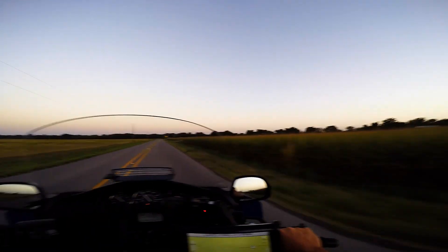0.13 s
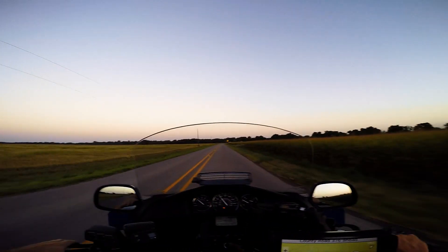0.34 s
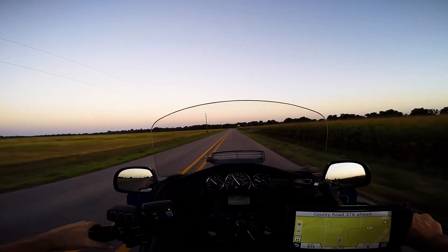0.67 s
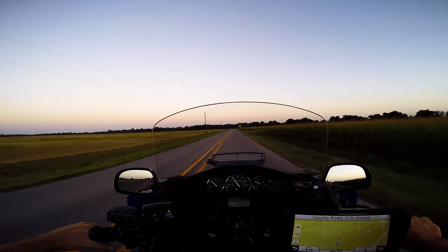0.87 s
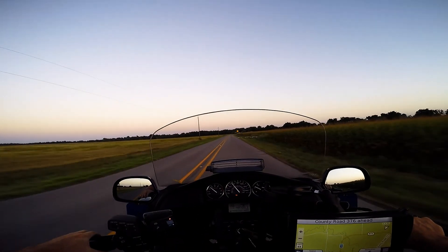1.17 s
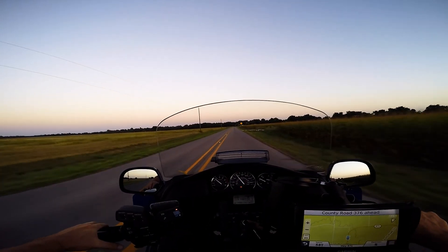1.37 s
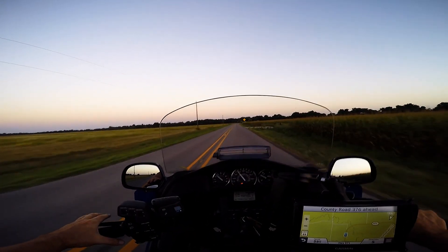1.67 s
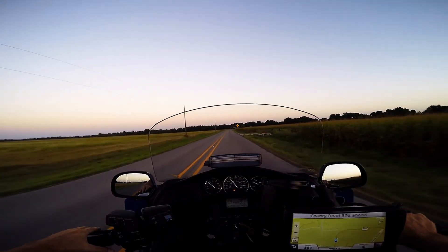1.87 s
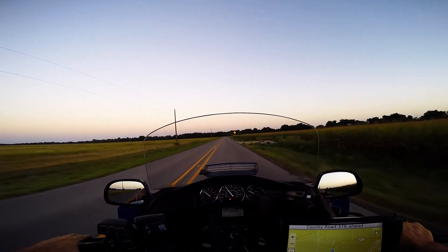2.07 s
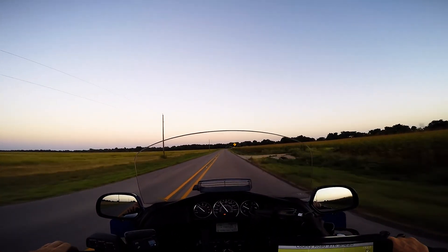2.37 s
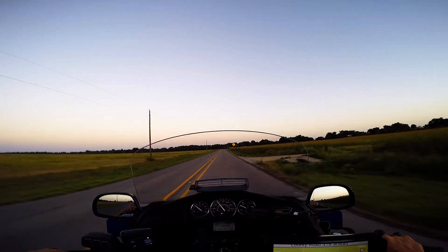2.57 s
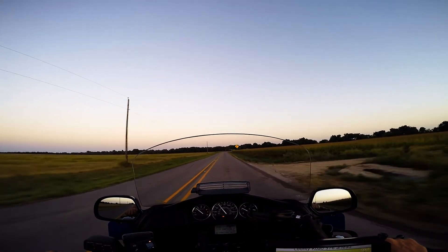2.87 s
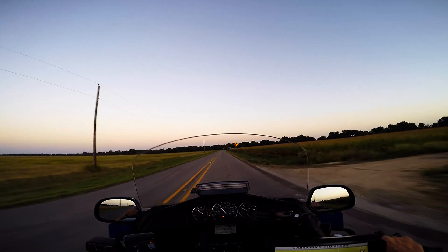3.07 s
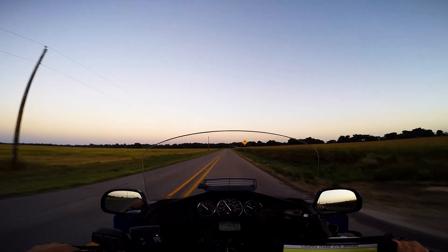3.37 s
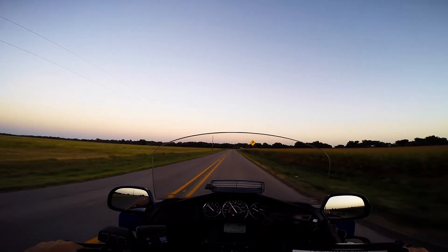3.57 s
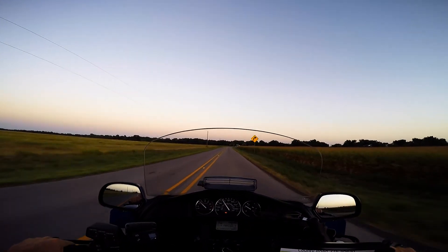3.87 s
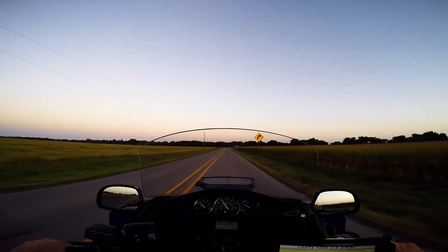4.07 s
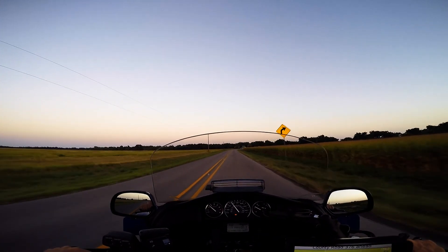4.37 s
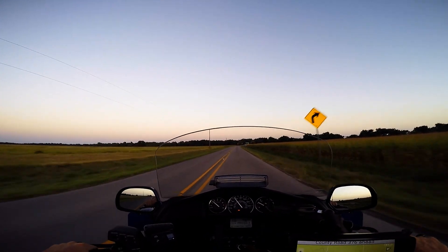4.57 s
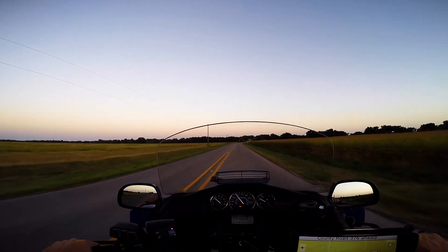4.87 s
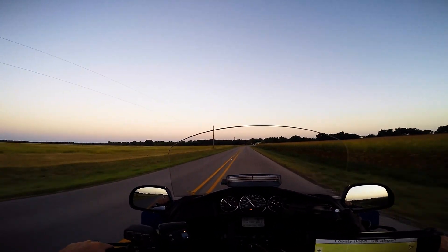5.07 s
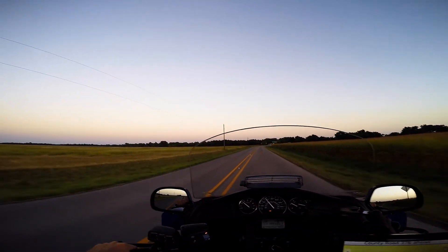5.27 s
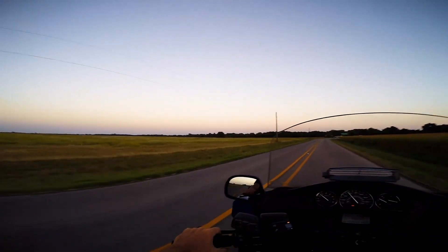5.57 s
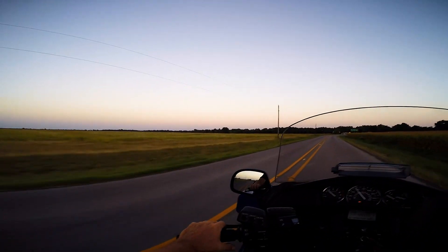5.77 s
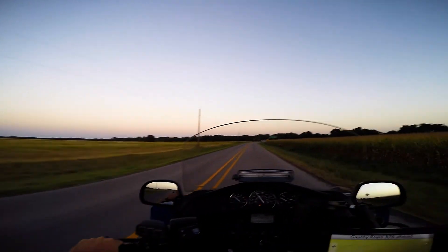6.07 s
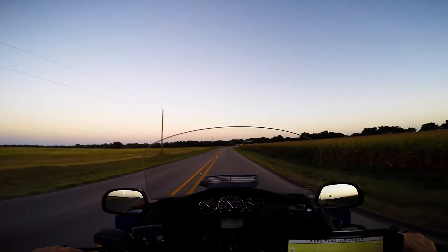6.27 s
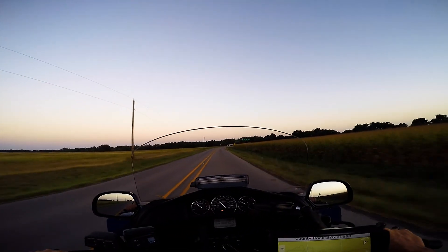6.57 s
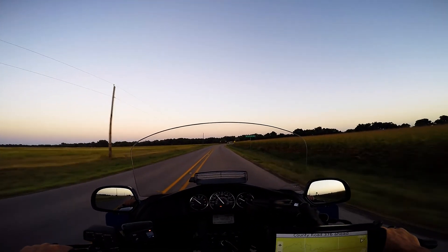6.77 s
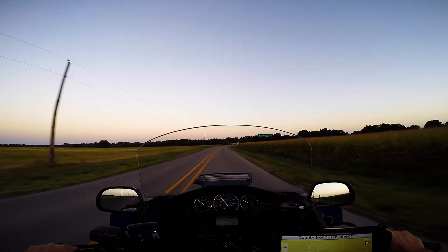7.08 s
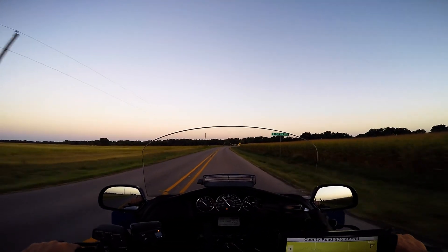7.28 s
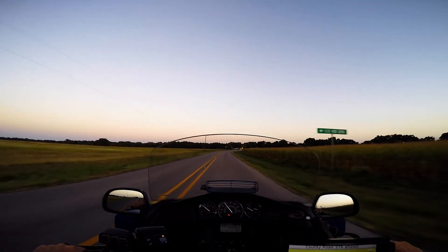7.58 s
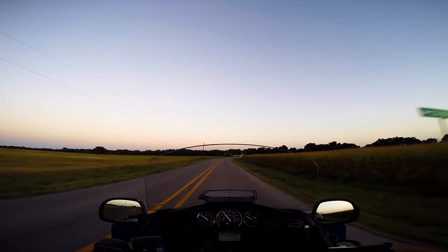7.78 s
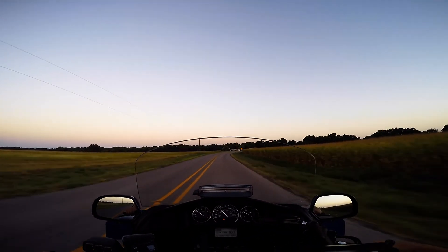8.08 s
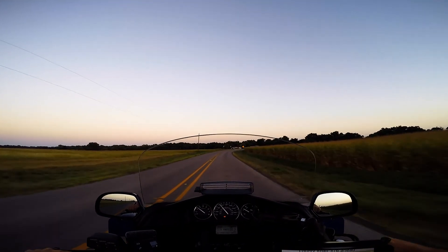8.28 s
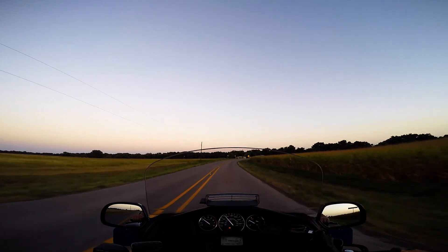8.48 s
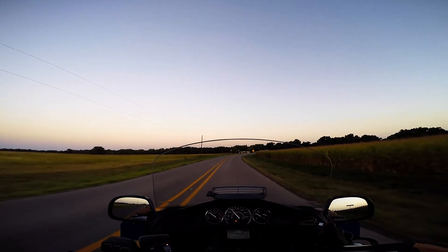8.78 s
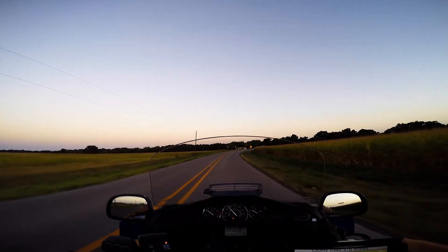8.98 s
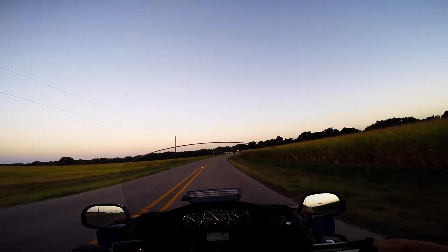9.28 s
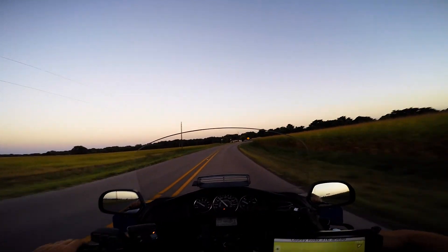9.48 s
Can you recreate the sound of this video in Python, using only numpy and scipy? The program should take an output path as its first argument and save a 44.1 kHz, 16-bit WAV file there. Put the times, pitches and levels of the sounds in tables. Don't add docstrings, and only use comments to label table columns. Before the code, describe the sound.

A motor trike cruises an open country road. Irregular low wind thumps strike a close microphone behind the windshield, over rumble, steady tyre and engine roar and a faint gear whine. Nearly everything sits on the right; the left carries only weak, muffled leakage and hiss. A loose plug crackles and briefly drops out near 1.6 and 6.6 seconds. After 8 seconds the whine fades and the roar eases.

```python
import sys
import numpy as np
from scipy import signal
from scipy.io import wavfile
from scipy.ndimage import uniform_filter1d

SR = 44100
rng = np.random.default_rng(int(sys.argv[2]) if len(sys.argv) > 2 else 0)


def how_loud(loudness_db):
    steps = np.asarray(loudness_db, float) / 20
    return 10 ** steps


def dump_mix(stems):
    frames = np.atleast_2d(stems).T
    limited = np.clip(frames, -1, 1)
    pcm = np.round(limited * 32767).astype(np.int16)
    wavfile.write(sys.argv[1], SR, pcm)


N = 425124


def rms_one(x):
    return x / np.sqrt(np.mean(x ** 2) + 1e-20)


def in_time(rows):
    s, *columns = np.transpose(rows)
    return [np.interp(np.arange(N) / SR, s, c) for c in columns]


def stretch(slow):
    return np.interp(np.arange(N) / 20, np.arange(len(slow)), slow)


def slow_chance(rate):
    r = np.exp(-40 * np.pi * rate / SR)
    white = rng.standard_normal(N // 20 + 3002)
    return rms_one(signal.lfilter([1], [1, -2 * r, r * r], white)[3000:])


def drift(rate):
    return stretch(slow_chance(rate))


def butter(x, hz, kind, order=2):
    return signal.sosfilt(signal.butter(order, hz, kind, fs=SR, output="sos"), x)


def resonance(x, hz, width):
    r = np.exp(-np.pi * width / SR)
    top = np.array([1, 0, -1]) * (1 - r * r) / 2
    return signal.lfilter(top, [1, -2 * r * np.cos(2 * np.pi * hz / SR), r * r], x)


def banded_noise(spectrum, shared_db, own_db, rate):
    hz, level_db = np.transpose(spectrum)
    thirds = int(3 * np.log2(hz[-1] / hz[0]))
    edges = hz[0] * 2 ** (np.arange(thirds + 1) / 3)
    white = rng.standard_normal((2, N + 8192))
    shared = shared_db * slow_chance(rate)
    out = 0
    for k, (low, high) in enumerate(zip(edges, edges[1:])):
        band_db = np.interp(np.log(low * high) / 2, np.log(hz), level_db)
        gain = stretch(how_loud(band_db + shared + own_db * slow_chance(2.9 * rate)))
        out = out + gain * butter(white[k % 2], [low, high], "band")[8192:]
    return rms_one(out)


def eddies():
    # centre t/s, level/dB rms, half-
    # power length/ms, swirl f/Hz
    buffets = [(.227, -28, 25, 117), (.291, -22.5, 90, 110), (.361, -22, 9.2, 161), (.566, -28.5, 13, 101),
               (.695, -21.5, 12, 114), (1.898, -21.5, 16, 112), (2.189, -27.5, 90, 114),
               (2.35, -27.5, 71, 104), (2.741, -22, 8, 125), (2.84, -17, 12, 110), (3.087, -24, 41, 159),
               (3.155, -20.5, 12, 166), (3.2, -24.5, 43, 104.5), (3.366, -24, 17.5, 168),
               (3.545, -21, 12.7, 146), (4.153, -24.5, 35, 120), (4.182, -19, 18, 176),
               (4.23, -24.5, 32, 110), (4.426, -21.5, 28, 137), (4.485, -24.5, 21, 121),
               (4.665, -16, 19, 136), (4.692, -17.5, 12, 103), (5.009, -21, 24, 133),
               (5.166, -26.5, 9.2, 159), (5.942, -26.5, 16, 105), (6.044, -19, 37, 136),
               (6.138, -24, 13, 110), (7.112, -25.5, 35, 132), (7.445, -22.5, 16.7, 175),
               (7.47, -23.5, 36, 86),
               (0.038, -34.5, 36, 112), (.457, -30.5, 18, 129), (0.521, -27.5, 21, 120), (.738, -30, 30, 121),
             (0.824, -30, 9.3, 104), (.927, -30, 30, 113), (1.081, -28, 19, 141), (1.267, -26, 34, 86),
             (1.423, -27.5, 29, 132), (1.651, -32, 8, 124), (1.996, -28, 32, 143), (2.134, -30.5, 16, 111),
             (3.931, -28.5, 77, 136), (4.365, -29.5, 33, 170.4), (4.738, -27, 13, 142),
             (4.878, -28, 25, 180), (5.306, -27.5, 48, 109), (6.259, -27, 21, 142), (6.331, -25.5, 25, 155),
             (6.638, -28, 14.6, 103), (6.78, -30, 57, 98), (6.998, -28, 12, 100), (7.285, -27, 28, 165),
             (7.867, -25.5, 18, 126), (7.945, -26, 100, 107), (8.515, -26, 27, 131),
             (8.741, -33.5, 34, 135), (9.0, -29.5, 180, 138), (9.144, -28, 36, 148), (9.509, -30, 130, 136)]
    # centre t/s, level/dB rms, swirl f/Hz
    ripples = [(0.411, -25, 94), (1.031, -35, 105), (1.538, -41, 197), (1.739, -32, 126),
               (1.814, -36.5, 205), (2.51, -33.5, 125), (2.642, -32, 136), (2.803, -36, 98),
               (3.008, -35.5, 113), (3.631, -32.5, 128), (3.865, -37.5, 105), (4.016, -44, 160),
               (4.262, -36.5, 207), (5.134, -33.5, 120), (5.852, -33, 84), (6.4, -40, 150),
               (6.584, -37.5, 147), (6.93, -47, 100), (7.082, -31, 122), (7.251, -32, 91),
               (7.336, -29.5, 89), (7.418, -31.5, 150), (7.506, -32.5, 154), (7.681, -32, 105),
               (7.779, -36, 102), (8.039, -36, 117), (8.21, -31.5, 163), (8.631, -33, 147),
               (9.178, -32, 163), (9.566, -33, 113)]
    rows = buffets + [(s, db, 33, hz) for s, db, hz in ripples]
    swings, strength = np.zeros(N), np.zeros(N)
    chance = rng.standard_normal((len(rows), 7))
    wobble = np.cumsum(0.36 * drift(92.0)) / SR
    reach = 0.09
    for (s, level_db, ms, hz), (phase, glide, skew, lean, pace, bulk, edge) in zip(rows, chance):
        octaves = np.log2(hz / 120.0)
        halvings = np.log2(23 / ms)
        heave_db = -7 + octaves + 5.5 * bulk
        tear_db = -13.0 + 7.5 * octaves + 1.5 * halvings + 4 * edge
        at = np.arange(max(int((s - reach) * SR), 0), min(int((s + reach) * SR), N))
        t = at / SR - s
        taper = np.cos(np.pi / 2 * t / reach) ** 2
        shape = how_loud(level_db) * taper * np.exp(-.75 * np.abs(t / (ms / 2000)) ** 1.6)
        bend = wobble[at] - wobble[int(s * SR)]
        cycles = t + bend - t * np.sum(shape * bend * t) / np.sum(shape * t * t)
        swirl = np.sin(2 * np.pi * hz * (cycles + 3.1 * glide * t ** 2) + 9 * phase)
        tear = np.sin(2 * np.pi * 300 * (1 + 0.079 * skew) * cycles + 7 * skew)
        heave_hz = 58 * (1 + 0.59 * np.tanh(pace))
        heave = np.exp(-(t / 0.016) ** 2) * np.sin(2 * np.pi * heave_hz * t + 9 * lean)
        torn_swirl = shape * (swirl + how_loud(tear_db + 0.5) * tear)
        swings[at] += 1.234 * (torn_swirl + how_loud(level_db + heave_db + 0.5) * heave)
        strength[at] += shape * how_loud(tear_db)
    spray = butter(butter(rng.standard_normal(N), 580, "low"), 240, "high")
    return swings + how_loud(-13.5) * strength * rms_one(spray), strength


def wind():
    # t/s, level/dB
    airflow = [(0.0, -58), (0.1, -49.5), (0.4, -40.5), (1.53, -50.5), (2.22, -45.5), (2.55, -53.5),
               (3.94, -50), (4.27, -48.5), (4.99, -43.5), (5.42, -60), (5.66, -55.5), (6.04, -50),
               (8.03, -47), (8.21, -53.5), (9.13, -49), (9.26, -53), (9.48, -61), (9.64, -43.5)]
    # f/Hz, level/dB per Hz
    rumble_spectrum = [(12, -36), (25, -4), (45, -2.5), (70, -3), (110, -11.5), (200, -31.5)]
    # f/Hz, level/dB per Hz
    turbulence_spectrum = [(50, -12), (90, 1.5), (130, -2.5), (220, -3), (350, -13.5), (600, -26),
                           (1100, -33)]
    flow_db, = in_time(airflow)
    flow_db = flow_db - flow_db.mean()
    rumble = banded_noise(rumble_spectrum, shared_db=3.5, own_db=1.0, rate=3.9)
    turbulence = banded_noise(turbulence_spectrum, shared_db=6.5, own_db=0.6, rate=17.0)
    return how_loud(-39 + 0.52 * flow_db) * rumble + how_loud(-42 + 1.02 * flow_db) * turbulence


def road(gusts):
    # f/Hz, level/dB per Hz
    roar_spectrum = [(150, -6), (330, -1.5), (520, 1.5), (680, -3.5), (1180, -3), (1900, -8.5),
                     (2400, -13.5), (3300, -22), (4400, -18), (5600, -22), (7500, -32.5), (9500, -23),
                     (13000, -38.5), (16000, -35)]
    # f/Hz, width/Hz, level at the start/dB, level at the end/dB
    body = [(542.7, 12.6, -13, -24), (867.6, 110, -11, -13), (1175, 106, -11.5, -6.5),
            (1009, 67, -14.5, -11.5), (1950, 46, -23.5, -17), (2100, 95, -19.5, -19)]
    roar = banded_noise(roar_spectrum, shared_db=0.46, own_db=1.11, rate=31)
    white = rng.standard_normal(N)
    for hz, width, start_db, end_db in body:
        ring = rms_one(resonance(resonance(white, hz, width), hz, width))
        roar = roar + how_loud(np.linspace(start_db, end_db, N)) * ring
    roar_db = -45.5 - 3 * (np.arange(N) / N) ** 2
    return how_loud(roar_db) * roar * (1 + 1.5 * uniform_filter1d(gusts, size=800))


def whines():
    # t/s, gear mesh f/Hz, load level/dB
    drive = [
        (0, 525.8, 3.5),
        (2, 535.8, -2.5),
        (4, 529.4, -2),
        (5, 536.6, 1.5),
        (6, 524, 0),
        (7, 515.2, -2.5),
        (7.6, 515, -4),
        (8.2, 516, -29),
        (9.64, 538, -22),
    ]
    # multiple of the gear mesh, level/dB rms, flutter/dB
    tones = [(1, -55.5, 2.5), (2, -64.5, 2.5), (1.647, -62, 2.5), (3.294, -69, 3), (3.65, -76, 3),
             (5.54, -80, 3)]
    mesh_hz, load_db = in_time(drive)
    turn = 2 * np.pi * np.cumsum(mesh_hz * (1 + 0.0015 * drift(2.5))) / SR
    out = np.zeros(N)
    for multiple, db, flutter_db in tones:
        level = np.sqrt(2) * how_loud(db + load_db + flutter_db * drift(9.9))
        out += level * np.sin(multiple * turn)
    return out


def electronics():
    # place in the frame/0-1, level/dB
    readout = [(.725, -3), (.745, 0), (.79, 0), (.165, -6), (.275, -7), (.475, -8), (.6, -6), (.94, -8)]
    # f/Hz, left level/dB, right level/dB
    whistles = [(6293, -92, -90), (6324, -94, -94), (12618, -86, -81)]
    frame_hz = 59.94
    white = rng.standard_normal((3, N))
    supply = how_loud(-90) * butter(white[2], 12500, "high", order=4) + how_loud(-68) * resonance(white[2], 15150, 500)
    hiss = how_loud([[-70.5], [-67]]) * (white[:2] + 1.04 * butter(white[:2], 11800, "high"))
    ticks = np.zeros(N + SR)
    frames = np.arange(int(N / SR * frame_hz) + 1)
    for place, db in readout:
        at = ((frames + place) / frame_hz * SR).astype(int)
        ticks[at] = how_loud(db + 1.5 * rng.standard_normal(len(frames)))
    buzz = rms_one(resonance(resonance(ticks[:N], 15150, 1000), 15150, 1000))
    buzz = how_loud(-74 + 2.5 * drift(9)) * buzz
    t = np.arange(N) / SR
    thin = np.zeros((2, N))
    for hz, left_db, right_db in whistles:
        tone = np.sin(2 * np.pi * hz * t + 2.5 * drift(3))
        thin += np.sqrt(2) * how_loud([[left_db], [right_db]]) * tone
    return hiss + how_loud([[-5], [0]]) * (supply + buzz) + thin


def cross_talk(line):
    wander = rms_one(butter(butter(rng.standard_normal(N), 70, "low"), 25, "high"))
    return how_loud(-27.8) * butter(line, 160, "low", order=1) + how_loud(-75) * wander


def loose_plug(x):
    # t/s, peak level/dB
    crackles = [(.6608, -43), (1.5489, -40), (1.5547, -39), (1.5578, -40), (1.565, -43), (1.5788, -43),
                (1.6573, -45), (1.6682, -35.5), (1.7008, -29), (1.7262, -40), (1.7444, -42), (4.3532, -34),
                (4.359, -33), (4.3605, -39), (4.4184, -33), (6.5436, -43), (6.5576, -45), (6.5709, -44),
                (6.5818, -34), (6.5835, -38), (6.5876, -36), (6.5929, -36), (6.611, -41), (6.6135, -35),
                (6.639, -46), (6.7151, -41)]
    # from t/s, to t/s, level of what still passes/dB
    dropouts = [
        (1.566, 1.578, -17),
        (1.5865, 1.628, -24),
        (6.5585, 6.5705, -15),
        (6.5885, 6.5925, -10),
    ]
    t, out = np.arange(N) / SR, x.copy()
    for start, end, leak_db in dropouts:
        dead = (t >= start) & (t < end)
        out[dead] = x[dead][0] * np.exp(-(t[dead] - start) / 0.0018) + how_loud(leak_db) * x[dead]
        back = t >= end
        out[back] -= .85 * x[back][0] * np.exp(-(t[back] - end) / .006)
    slip_s, peak_db = np.transpose(crackles)
    at = (slip_s * SR).astype(int)
    height = -np.sign(out[at]) * how_loud(peak_db + 1.2)
    bounce = np.arange(24)
    chatter = rng.standard_normal((len(at), 24)) * np.exp(-bounce / 9)
    spikes = np.zeros(N)
    spikes[at[:, None] + bounce] = 0.2 * height[:, None] * chatter
    spikes[at] = height
    recoil = resonance(spikes, 610, 1140)
    return out + spikes + 13.0 * recoil


def scene():
    thumps, gusts = eddies()
    capsule = thumps + wind() + road(gusts) + whines()
    return np.array([capsule, capsule])


def band_limit(x):
    return signal.sosfilt(signal.butter(12, 15320, fs=SR, output="sos"), x)


def record(dry):
    line = loose_plug(butter(dry[1], 28.0, "high"))
    mix = np.array([cross_talk(line), line]) + electronics()
    return band_limit(mix)


dry = scene()
out = record(dry)
dump_mix(out)
```